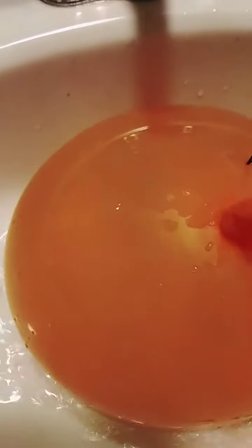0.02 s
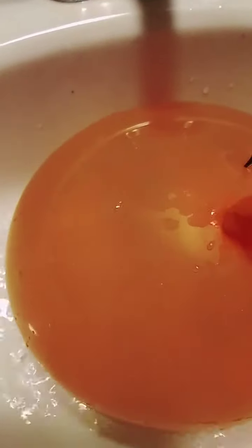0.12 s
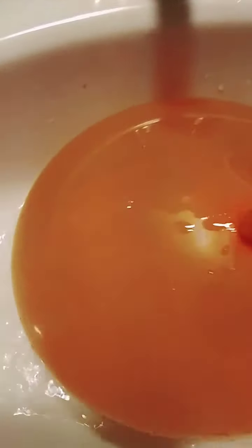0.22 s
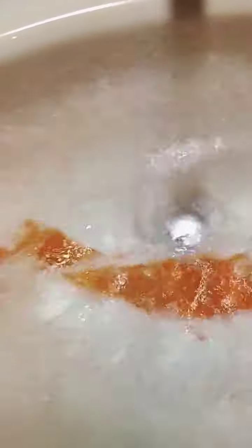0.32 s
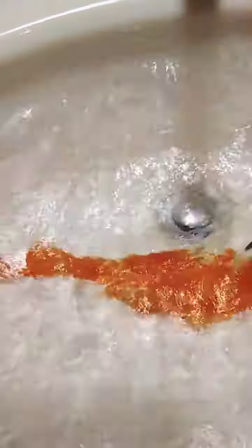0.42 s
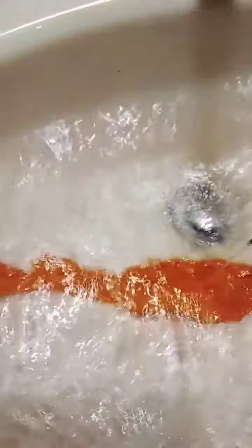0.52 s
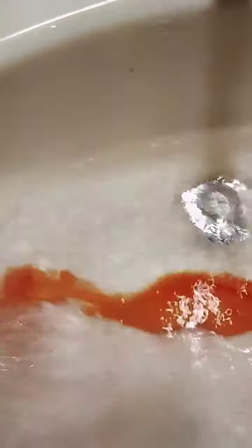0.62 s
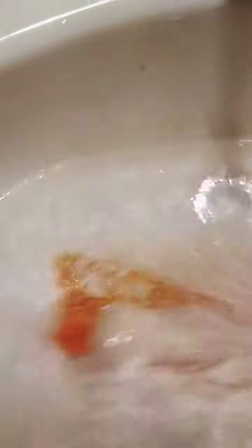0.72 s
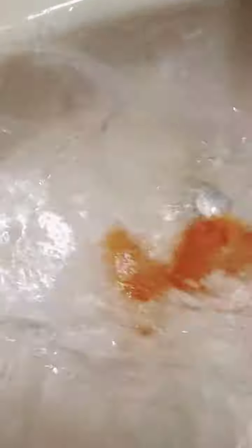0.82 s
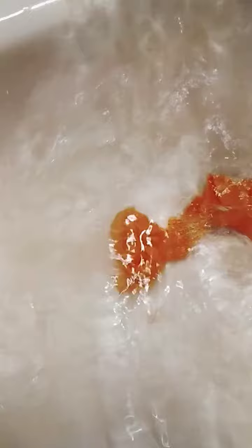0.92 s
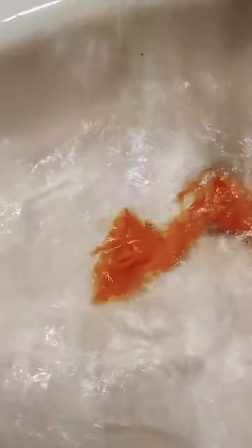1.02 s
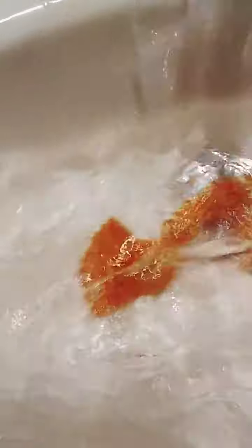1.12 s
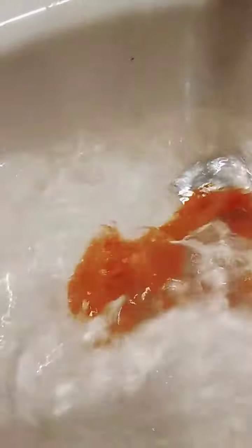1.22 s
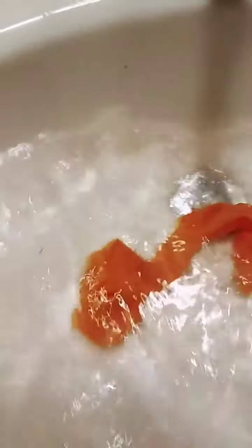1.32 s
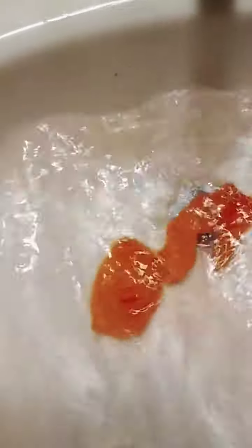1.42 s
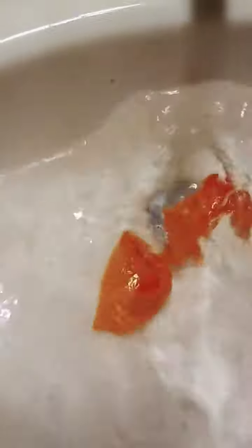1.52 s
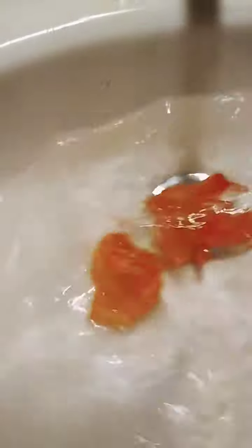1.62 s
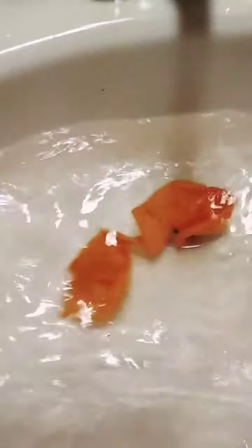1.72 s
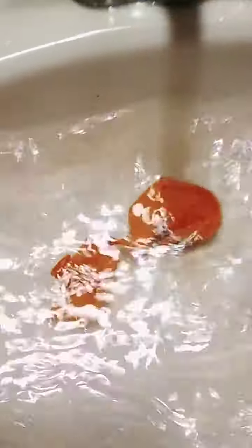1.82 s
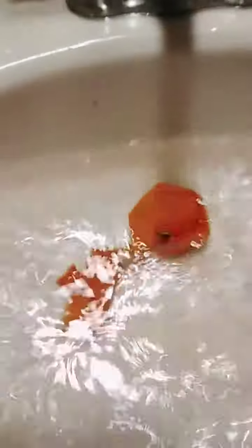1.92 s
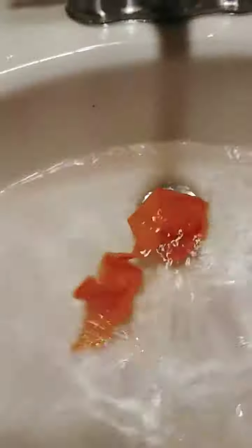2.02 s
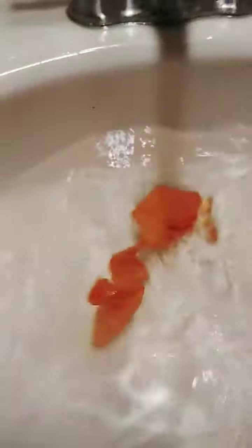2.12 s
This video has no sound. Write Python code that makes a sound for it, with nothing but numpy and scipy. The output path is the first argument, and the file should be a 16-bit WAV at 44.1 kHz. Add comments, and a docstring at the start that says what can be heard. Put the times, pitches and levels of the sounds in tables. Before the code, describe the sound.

A water balloon bursts in a bathroom basin, water slapping and splashing, then thinning to drips

```python
"""Water balloon bursting in a bathroom basin

A burst of noise flings the water out; slaps, spray and ticks are shaped noise, while trapped bubbles are
damped sines of rising pitch. Closing air pockets gurgle as upward sweeps and the bowl rings in decaying
modes. The splashing thins out to a few drips in a small hard room, made by convolving with decaying noise."""
import sys
import numpy as np
from scipy import signal
from scipy.fft import rfft, irfft
from scipy.io import wavfile
from scipy.ndimage import uniform_filter1d

SR = 44100
rng = np.random.default_rng(int(sys.argv[2]) if len(sys.argv) > 2 else 0)


def output_pcm(signal):
    """Save a mono or channel-first signal as 16-bit PCM at the path in sys.argv[1].

    Samples are clipped to [-1, 1] before scaling.
    """
    pcm = np.clip(np.atleast_2d(signal).T, -1, 1) * 32767
    wavfile.write(sys.argv[1], SR, np.round(pcm).astype(np.int16))


N = 97020
TIME = np.arange(N) / SR

# spectrum of splattering water in slaps and churn: (frequency [Hz], relative level [dB])
SPLATTER_COLOUR = [(500, -29), (1000, -14.5), (2500, -2.5), (5000, 0.5), (7000, -10)]
BUBBLE_CYCLES = 5.6   # decay of a small bubble, in periods of its pitch
CHURN_LOW_HZ = 716   # lower edge of the churn's bubbles and upper edge of its lowest surging band


def from_db(db):
    """Level to amplitude: 20 dB is a factor of ten."""
    return 10 ** (np.asarray(db) / 20)


def rms_one(x):
    """Normalise the mean power to one."""
    return x / np.sqrt(np.mean(x ** 2) + 1e-20)


def level(curve):
    """Gain envelope: interpolate a (time [s], level [dB]) curve at every sample."""
    return from_db(np.interp(TIME, *np.transpose(curve)))


def at_hz(points, hz):
    """Spectral interpolation: read a (frequency [Hz], level [dB]) table on a logarithmic axis."""
    f, db = np.transpose(points)
    return np.interp(np.log(np.maximum(hz, 1)), np.log(f), db)


def add(out, s, x):
    """Superposition: mix a sound in at time s [s]."""
    i = int(np.clip(s * SR, 0, N))
    out[i:i + len(x)] += x[:N - i]


def coloured(x, spectrum, size=4096):
    """Minimum-phase filtering: a causal response of given spectrum, from its folded cepstrum, at unit power gain."""
    magnitude = from_db(at_hz(spectrum, np.arange(size // 2 + 1) * SR / size))
    cepstrum = irfft(np.log(magnitude))
    # fold the negative times onto the positive ones
    cepstrum[1:size // 2] *= 2
    cepstrum[size // 2 + 1:] = 0
    pulse = irfft(np.exp(rfft(cepstrum)))
    return signal.fftconvolve(x, pulse / np.linalg.norm(pulse))[:len(x)]


def above(x, hz, order=4):
    """High-pass filtering: attenuate what lies below a cutoff [Hz]."""
    return signal.sosfilt(signal.butter(order, hz, "high", fs=SR, output="sos"), x)


def evened(x, size=1500):
    """Running power normalisation: hold the slow level at one and keep the grain."""
    return x / np.sqrt(np.abs(uniform_filter1d(x ** 2, size)) + 1e-9)


def wobble(size, count=120):
    """Smoothed noise: a random wander of unit rms, averaged twice over count samples."""
    return rms_one(uniform_filter1d(uniform_filter1d(rng.standard_normal(size), count), count))


def bubble(hz, decay_s, rise, attack_s):
    """Bubble resonance: a damped sine gaining the share `rise` of its pitch per decay time, as if surfacing."""
    t = TIME[:int(6 * decay_s * SR) + 2]
    envelope = (1 - np.exp(-t / attack_s)) * np.exp(-t / decay_s)
    return envelope * np.sin(2 * np.pi * hz * t * (1 + rise * t / decay_s / 2))


def bubble_cloud(pitches, per_s, cycles, count=6000):
    """Random superposition of bubbles, spread evenly over the octaves of a pitch table; unit level."""
    spread_db, rise = 5, 0.049   # mean of the random boost [dB]; share of pitch gained per decay
    out, low, high = np.zeros(N), pitches[0][0], pitches[-1][0]
    for when, where, size, sign in rng.random((count, 4))[:int(per_s * N / SR)]:
        hz = low * (high / low) ** where
        db = at_hz(pitches, hz) - spread_db * np.log(max(size, .01))
        # higher bubbles are shorter: the square root restores their energy
        gain = np.sign(sign - .5) * from_db(db) * np.sqrt(hz / low)
        add(out, when * N / SR, gain * bubble(hz, cycles / hz, rise, 1 / hz))
    return evened(out)


def patter(spectrum):
    """Random impulse train: thousands of droplet impacts in uneven clumps; unit level."""
    droplets_per_s, clump_db, clump_s = 5900, 7.5, .003
    ticks = (rng.random(N) < droplets_per_s / SR) * rng.choice([-1, 1], N)
    clumps = from_db(clump_db * wobble(N, count=int(clump_s * SR)))
    return evened(coloured(ticks * clumps, spectrum))


def clumped(x, count=5):
    """Independent band modulation: bands surge and drop out as sheets of water break up; unit level."""
    clump_db, clump_s = 5, .008
    out = 0
    for hz in CHURN_LOW_HZ * 2 ** np.arange(count):
        low = signal.sosfiltfilt(signal.butter(4, hz, fs=SR, output="sos"), x)
        out = out + low * from_db(clump_db * wobble(N, count=int(clump_s * SR)))
        x = x - low   # what remains passes to the next band, an octave higher
    return evened(out + x, size=3000)


def tick(hz, decay_s):
    """Film rupture: an exponentially dying burst of noise around one pitch."""
    half_width = 0.17   # in log pitch
    t = TIME[:int(6 * decay_s * SR) + 2]
    edges = hz * np.exp([-half_width, half_width])
    band = signal.butter(2, edges, "band", fs=SR, output="sos")
    noise = rms_one(signal.sosfilt(band, rng.standard_normal(SR)))
    return np.exp(-t / decay_s) * noise[:len(t)]


def spray():
    """Many small impacts: fine droplets tick on water and ceramic, with a fizz of tiny bubble resonances."""
    # fine spray landing: (time [s], level [dB])
    spray_curve = [(0, -34.5), (.1, -76), (.19, -36), (.215, -33), (.245, -21), (.30, -24), (.38, -36),
                   (.46, -31), (.53, -41), (.62, -42), (.66, -32), (.75, -32.5), (.79, -32), (.93, -28),
                   (1.12, -40.5), (1.18, -31.5), (1.36, -59.5), (1.485, -72), (1.503, -32.5), (1.53, -35.5),
                   (1.59, -53), (1.70, -52), (1.82, -81.5), (1.92, -73), (2.005, -49.5), (2.1, -90.5)]
    # spectrum of the impacts: (frequency [Hz], relative level [dB])
    spray_colour = [(700, -49.5), (4000, -30.5), (5400, -5.5), (7700, -0.5), (9500, 5.5), (11500, 3.5),
                    (13000, -12.5), (15500, -22)]
    # tiny bubbles: (pitch [Hz], relative level [dB])
    fizz_pitches = [(4500, -12.5), (7800, 3), (13000, -5)]
    fizz_per_s, fizz_cycles = 1800, 8
    impact_db, fizz_db = -6, -3.5
    fizz = above(bubble_cloud(fizz_pitches, fizz_per_s, fizz_cycles), fizz_pitches[0][0])
    return level(spray_curve) * (from_db(impact_db) * patter(spray_colour) + from_db(fizz_db) * fizz)


def churn():
    """Bubble entrainment: breaking water splatters and traps small bubbles over the slosh's deep glugs."""
    # small bubbles and splatter: (time [s], level [dB])
    churn_curve = [(0, -58.5), (.1, -112), (.21, -72), (.23, -35), (.32, -37), (.37, -43), (.46, -44),
                   (.53, -49), (.62, -46), (.66, -36), (.75, -51), (.80, -31), (.87, -49), (.94, -39),
                   (1.12, -56.5), (1.17, -42), (1.23, -50), (1.30, -68), (1.42, -89.5), (1.8, -92)]
    # small bubbles: (pitch [Hz], relative level [dB])
    churn_pitches = [(800, -13.5), (1200, 1), (3000, 4), (5500, -0.5)]
    # big bubbles in the sloshing water: (time [s], level [dB])
    slosh_curve = [(0, -60), (.21, -111), (.225, -61), (.29, -32), (.35, -44), (.41, -49.5), (.46, -30),
                   (.52, -44.5), (.6, -49.5), (.82, -57.5), (.92, -64), (1.06, -56.5), (1.14, -68),
                   (1.45, -63.5), (1.49, -54.5), (1.56, -53), (1.66, -81.5)]
    # big bubbles: (pitch [Hz], relative level [dB])
    slosh_pitches = [(170, -9), (300, -4), (430, -1.5), (900, 1)]
    bubbles_per_s, glugs_per_s, glug_cycles = 2000, 500, 5.4
    small_db, deep_db, splatter_db = 4.5, -0.5, -1.5
    small = above(bubble_cloud(churn_pitches, bubbles_per_s, BUBBLE_CYCLES), CHURN_LOW_HZ)
    deep = bubble_cloud(slosh_pitches, glugs_per_s, glug_cycles)
    splatter = clumped(patter(SPLATTER_COLOUR))
    breaking = from_db(small_db) * small + from_db(splatter_db) * splatter
    return level(churn_curve) * breaking + level(slosh_curve) * from_db(deep_db) * deep


def gurgles(size=8000):
    """Cavity closure: a shrinking air pocket swells and fades while its pitch sweeps up ever faster."""
    # air pockets: (time [s], length [s], first pitch [Hz], last pitch [Hz], level [dB])
    pockets = [(0, 0.022, 1544, 2330, -44), (.006, 0.057, 620, 942, -47.5), (0.511, 0.058, 645, 1280, -42),
               (0.587, 0.019, 3400, 5360, -29.5), (0.911, 0.037, 770, 1107, -27),
               (1.32, 0.025, 1142, 3020, -31.5), (1.372, 0.086, 637, 1470, -37),
               (1.478, 0.016, 450, 950, -43), (1.497, 0.066, 605, 2204, -38),
               (1.531, 0.056, 300, 524, -44.5)]
    bend, swell = 1.35, .8   # exponents: above 1 the sweep speeds up; below 1 the peak comes early
    roughness, waver = .24, .026   # rms shares of amplitude and pitch
    out = np.zeros(N)
    for s, length, first_hz, last_hz, db in pockets:
        u = np.minimum(TIME[:size] / length, 1)
        hz = first_hz * (last_hz / first_hz) ** (u ** bend) * (1 + waver * wobble(size))
        envelope = np.sin(np.pi * u ** swell) * (1 + roughness * wobble(size))
        add(out, s, from_db(db) * envelope * np.sin(2 * np.pi * np.cumsum(hz) / SR))
    return out


def drops():
    """Drop impact: a lone drop lands with a sharp tick and the brief resonance of the bubble it traps."""
    # single drops: (time [s], level [dB], pitch [Hz])
    drop_list = [(0.0101, -22, 8200), (0.117, -36, 9550), (0.173, -29, 3960), (0.193, -22.5, 5370),
                 (0.315, -9, 2320), (0.706, -12.5, 3630), (1.137, -17, 9560), (1.222, -17.5, 4920),
                 (1.310, -36.5, 3200), (1.367, -29, 3000), (1.471, -40.5, 3340), (1.497, -30, 11500),
                 (1.598, -39, 6900), (1.6035, -17, 9240), (1.624, -24.5, 7210), (1.626, -45.5, 2600),
                 (1.665, -33, 6850), (1.6725, -26, 12500), (1.6907, -20, 9950), (1.7021, -30, 9530),
                 (1.988, -34.5, 6570), (1.995, -31, 10800)]
    decay_s, rise, tick_db, ping_db = 0.0019, .01, -8, -3
    out = np.zeros(N)
    for s, db, hz in drop_list:
        add(out, s, from_db(db + ping_db) * bubble(hz, decay_s, rise, 1 / hz))
        add(out, s, from_db(db + tick_db) * tick(hz, decay_s))
    return out


def slaps(size=6000):
    """Impact noise: each slap swells to a crack in milliseconds, with a ringing band and a short hiss."""
    # sheets of water slapping the basin: (time [s], relative peak level [dB])
    slap_list = [(0.2072, -11.5), (0.2804, -9), (0.3107, -4), (0.3141, -9.5), (0.3262, 0), (0.34, -3),
                 (0.397, -7), (0.4485, -17.5), (0.4766, -6), (0.5454, -6), (0.6363, -4), (0.6452, -3),
                 (0.7054, -17), (0.774, -1), (0.7925, -12), (0.8039, -10), (0.839, -9), (0.8553, -6),
                 (0.8713, -0.5), (0.8985, -8.5), (0.941, -5), (1.022, -9), (1.0941, -16.5), (1.142, -8),
                 (1.1644, -7.5), (1.1863, -16), (1.2225, -17.5), (1.496, -28), (1.5135, -16.5),
                 (1.5232, -16.5), (2.1885, -15)]
    # spectrum of the crack: (frequency [Hz], relative level [dB])
    slap_colour = [(700, -51.5), (3800, -32), (5500, -7.5), (7600, 6), (11000, -2.5), (13000, -8),
                   (15500, -17)]
    attack_s, tail_s, tail_db = 0.0021, 0.048, -14.5   # the tail is droplets thrown after the crack
    ring_hz, ring_width_hz, ring_db = 7880, 1500, -4
    crack_grows = 0.6   # harder slaps gain more crack than ring: extra dB per dB
    splat_db, splat_grows = -8, 0.85   # only hard slaps splatter in the middle range: extra dB per dB
    slap_db = -6
    out, t = np.zeros(N), TIME[:size]
    u = t / attack_s
    tail = from_db(tail_db) * np.minimum(u, 1) * np.exp(-t / tail_s)
    envelope = (u * np.exp(1 - u)) ** 2 + tail
    envelope_rms = np.sqrt(np.mean(envelope ** 2))
    edges = [ring_hz - ring_width_hz / 2, ring_hz + ring_width_hz / 2]
    band = signal.butter(2, edges, "band", fs=SR, output="sos")
    for s, db in slap_list:
        crack = rms_one(coloured(envelope * rng.standard_normal(size), slap_colour))
        splat = rms_one(coloured(envelope * rng.standard_normal(size), SPLATTER_COLOUR))
        ring = rms_one(signal.sosfilt(band, envelope * rng.standard_normal(size)))
        mix = from_db(crack_grows * db) * crack + from_db(ring_db) * ring
        mix = mix + from_db(splat_db + splat_grows * db) * splat
        add(out, s, from_db(db + slap_db) * envelope_rms * mix / 2)
    return out


def burst():
    """Sudden release: the skin rips and flings a dense sheet of droplets, a gated burst of coloured noise."""
    # spectrum of the burst: (frequency [Hz], relative level [dB])
    burst_colour = [(59, -38.5), (100, -14), (614, -29), (1110, -15), (1620, -36.5), (2520, -17.5),
                    (3250, -19.5), (4960, -16), (7730, 2.5), (11100, -2), (15500, -18.5)]
    onset_s, attack_s, hold_s, decay_s, burst_db = 0.2206, 0.00055, 0.026, 0.002, -6
    t = TIME - onset_s
    envelope = np.clip(t / attack_s, 0, 1) * np.exp(-np.maximum(t - hold_s, 0) / decay_s)
    return from_db(burst_db) * coloured(envelope * rng.standard_normal(N), burst_colour)


def bowl(size=16000):
    """Modal resonance: soft blows of water ring the basin's low modes, detuned each time by the shifting load."""
    # blows of the water's weight: (time [s], level [dB])
    thuds = [(0.221, -35), (0.263, -32.5), (.31, -34), (0.534, -38.5), (0.626, -43), (0.796, -40),
             (0.942, -35.5), (1.061, -52), (1.158, -48), (1.237, -51), (1.311, -50.5), (1.376, -55.5),
             (1.792, -53.5)]
    # modes of the bowl: (mean frequency [Hz], relative level [dB], 60 dB decay time [s])
    modes = [(77.25, 0.5, 0.25), (124, 1, 0.21), (153, -7, 0.063), (237, -8, 0.061)]
    attack_s, detune, scatter_db = 0.005, .06, 1.0   # detune is an rms share of the frequency
    out, t = np.zeros(N), TIME[:size]
    for s, db in thuds:
        for mean_hz, mode_db, t60 in modes:
            hz = mean_hz * (1 + detune * rng.standard_normal())
            ring = from_db(-60 * t / t60) * np.sin(2 * np.pi * (hz * t + rng.random()))
            gain = from_db(db + mode_db + rng.normal(0, scatter_db))
            add(out, s, gain * (1 - np.exp(-t / attack_s)) * ring)
    return out


def plinks(count=4):
    """Bubble pinch-off: larger bubbles splutter, ring in moving water and shed fragments at nearby pitches."""
    # larger bubbles: (time [s], pitch [Hz], relative level [dB], decay [ms])
    plink_list = [(.257, 948, -18.5, 6.4), (0.309, 218, -34, 37), (0.316, 2017, -7, 2.2),
                  (0.398, 2650, -19, 4.6), (.405, 1253, -30.5, 8.4), (0.446, 377.4, -38.5, 53),
                  (.548, 1590, -22.5, 5.3), (0.65, 2876, -19, 6.8), (0.654, 1463, -34, 38),
                  (.735, 3170, -21.5, 4.8), (0.775, 2776, -5.5, 2.7), (.778, 1155, -27.5, 18),
                  (0.81, 1080, -20.5, 8.5), (.913, 1553, -11, 7.4), (.914, 1330, -24, 4.6),
                  (0.958, 985, -22.5, 10.1), (1.023, 1760, -12, 2.14), (1.189, 1336, -25.5, 13.8),
                  (1.217, 950, -30, 9.9)]
    rise, attack_s, plink_db = 0.046, 0.006, 3.5   # rise is the share of pitch gained per decay time
    roughness, tick_db = 0.38, -3.5
    shed_db, shed_spread, shed_s = -8, .25, 0.019   # level, scatter of log pitch, break-off time
    out = np.zeros(N)
    for s, hz, db, decay_ms in plink_list:
        decay_s = decay_ms / 1000
        ring = from_db(db + plink_db) * bubble(hz, decay_s, rise, attack_s)
        peak = ring.max()
        rough_ring = ring * (1 + roughness * wobble(SR)[:len(ring)])
        add(out, s, rough_ring + from_db(tick_db) * peak * tick(hz, decay_s))
        delays = shed_s * rng.random(count)
        pitches = hz * np.exp(shed_spread * rng.standard_normal(count))
        for delay, own_hz in zip(delays, pitches):
            fragment = bubble(own_hz, BUBBLE_CYCLES / own_hz, rise, 1 / own_hz)
            add(out, s + delay, from_db(shed_db) * peak * fragment)
    return out


def bathroom(x, size=22000):
    """Diffuse reverberation: dense reflections from bowl and walls, as quickly decaying noise after a gap."""
    t60_s, gap_s = 0.22, 0.0016
    t = TIME[:size]
    tail = rng.standard_normal(size) * from_db(-60 * t / t60_s) * (t > gap_s)
    return signal.fftconvolve(x, tail / np.linalg.norm(tail))[:N]


def background():
    """Stationary noise: a faint steady floor, strongest in the bass."""
    # spectrum of the background: (frequency [Hz], relative level [dB])
    floor_colour = [(25, -12.5), (80, 9), (300, -12.5), (950, -9), (2000, -20.5), (15000, -25.5)]
    return from_db(-71) * coloured(rng.standard_normal(N), floor_colour)


def scene():
    """Superposition: the water and its reverberation, the ringing bowl and the background."""
    room_db = -11
    water = burst() + slaps() + spray() + drops() + churn() + plinks() + gurgles()
    return (water + from_db(room_db) * bathroom(water) + bowl() + background())[None]


def record(dry):
    """Saturation and band limiting: the loudest peaks are rounded and the top is cut."""
    overload, cutoff_hz = 0.69, 15900   # ceiling of the rounded amplitude; low-pass edge
    rounded = overload * np.tanh(dry / overload)
    # steep low-pass: 0.2 dB passband ripple, 80 dB rejection
    return signal.sosfilt(signal.ellip(10, .2, 80, cutoff_hz, fs=SR, output="sos"), rounded)


dry = scene()
out = record(dry)
output_pcm(out)
```